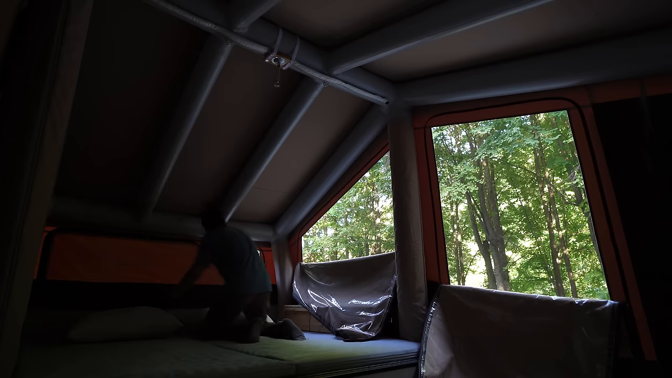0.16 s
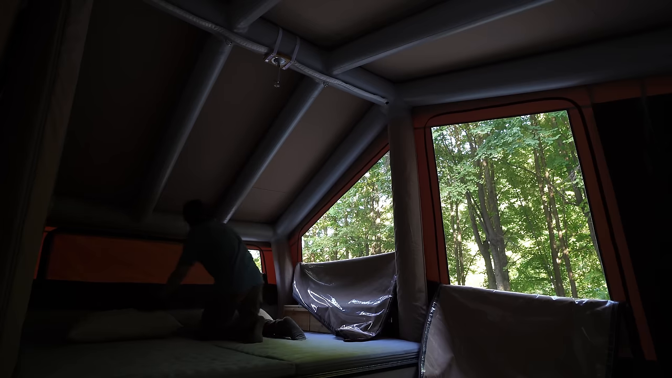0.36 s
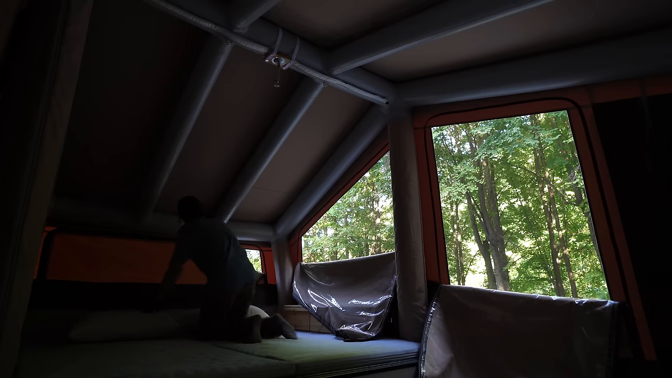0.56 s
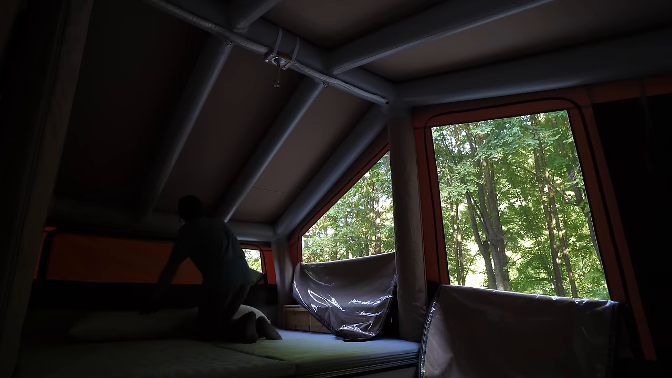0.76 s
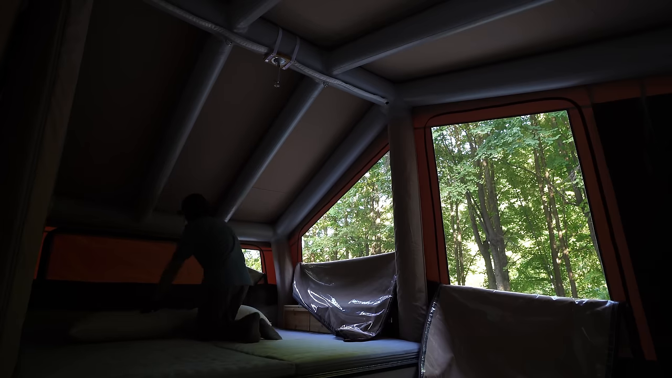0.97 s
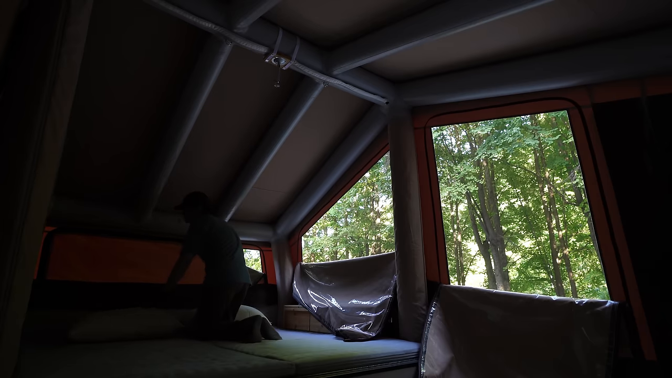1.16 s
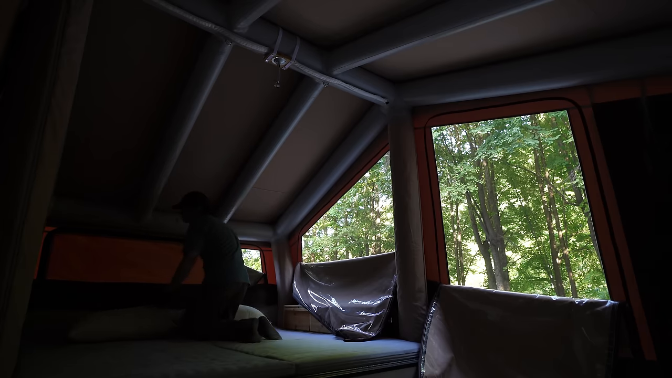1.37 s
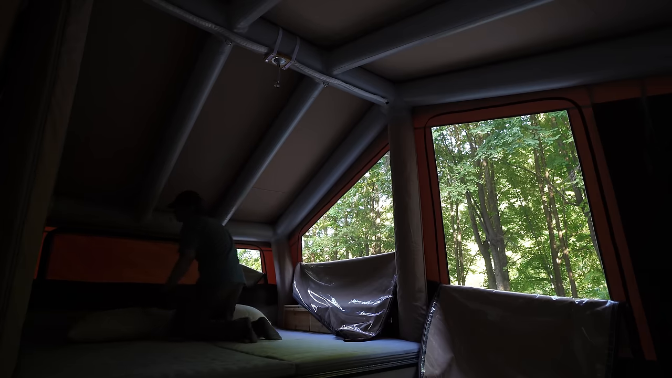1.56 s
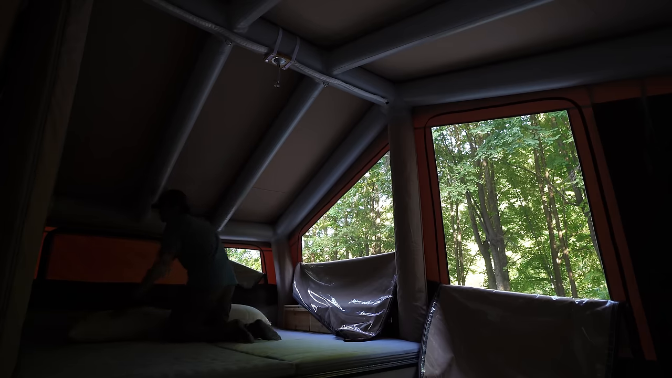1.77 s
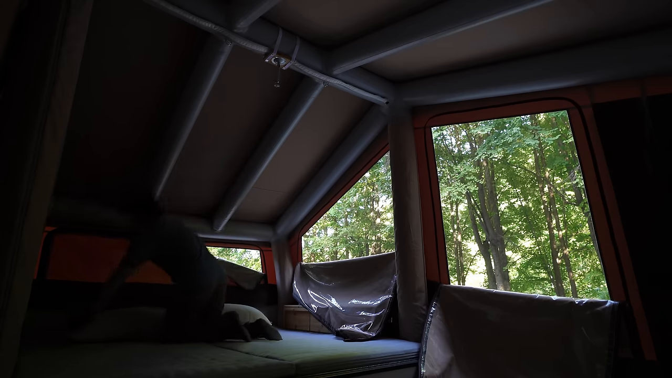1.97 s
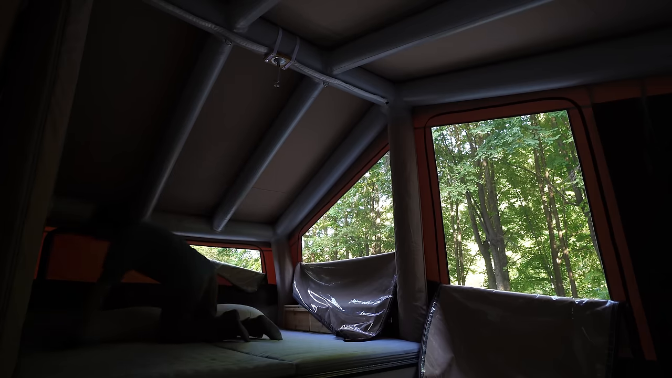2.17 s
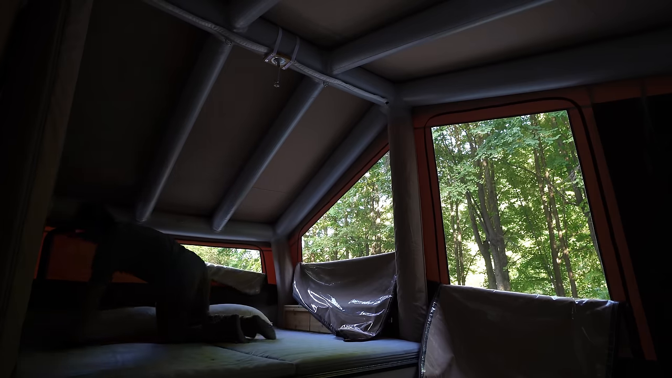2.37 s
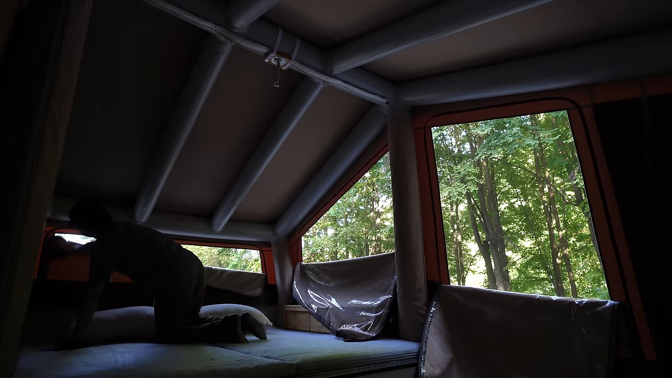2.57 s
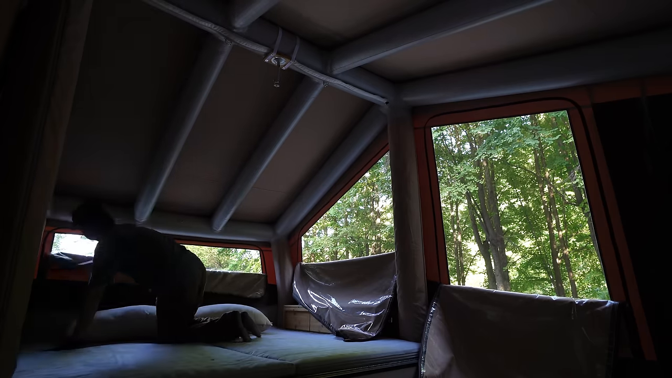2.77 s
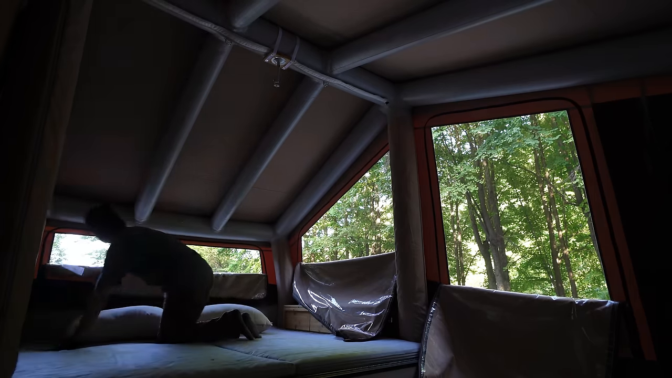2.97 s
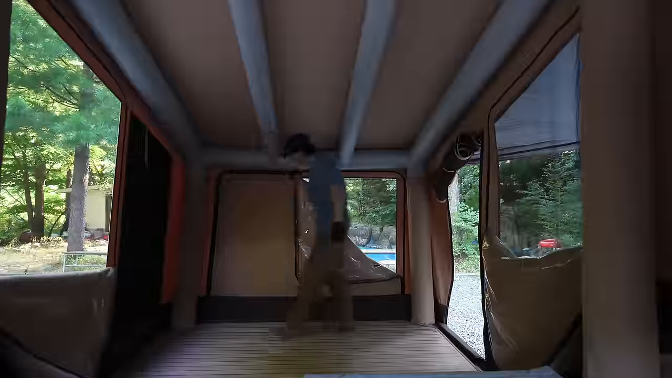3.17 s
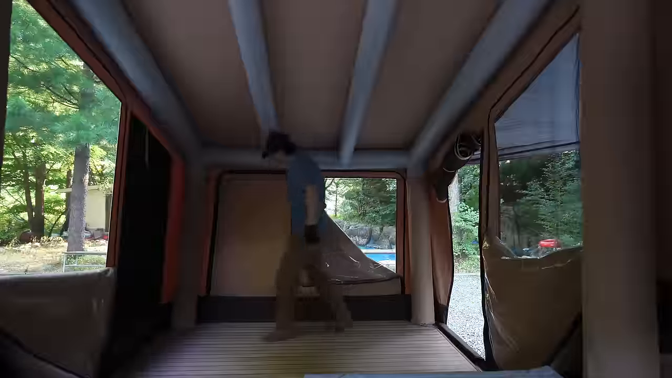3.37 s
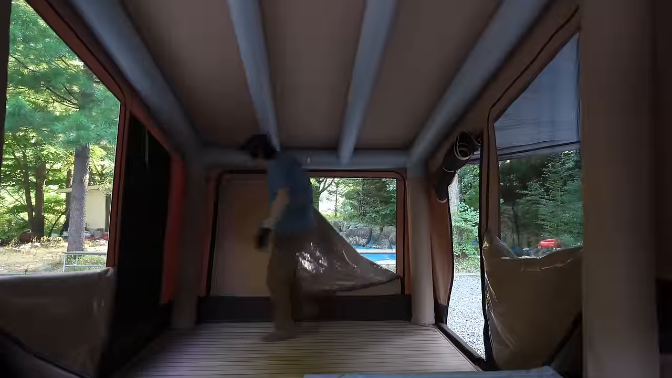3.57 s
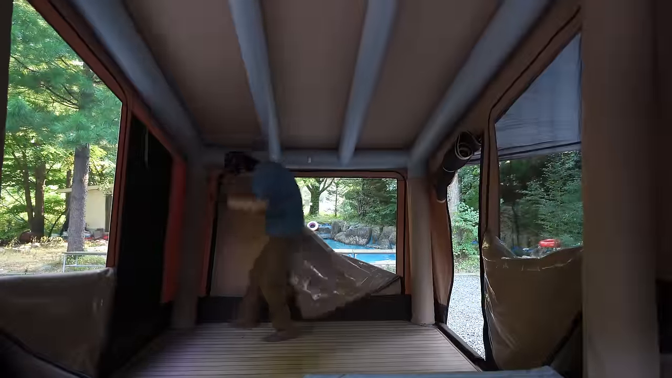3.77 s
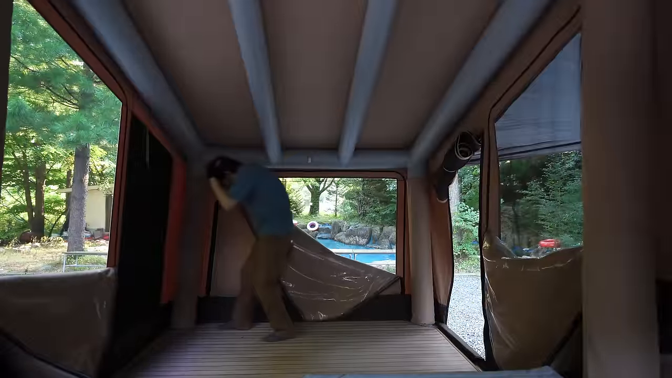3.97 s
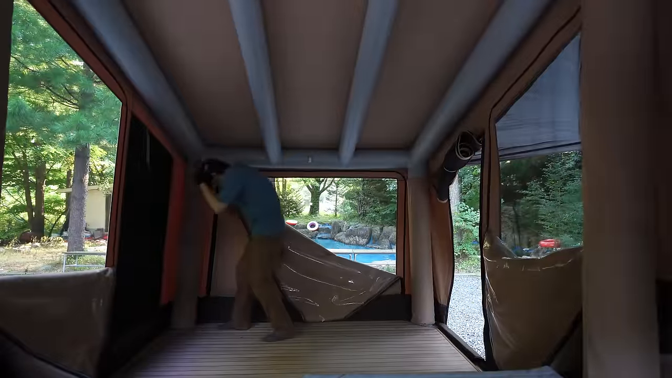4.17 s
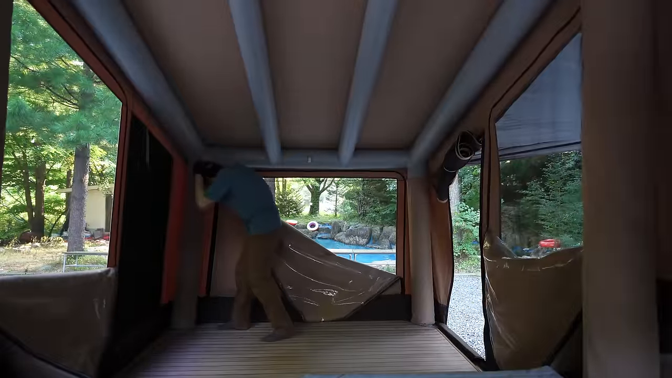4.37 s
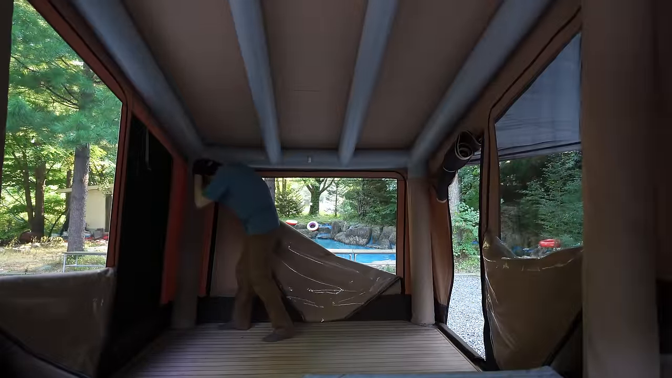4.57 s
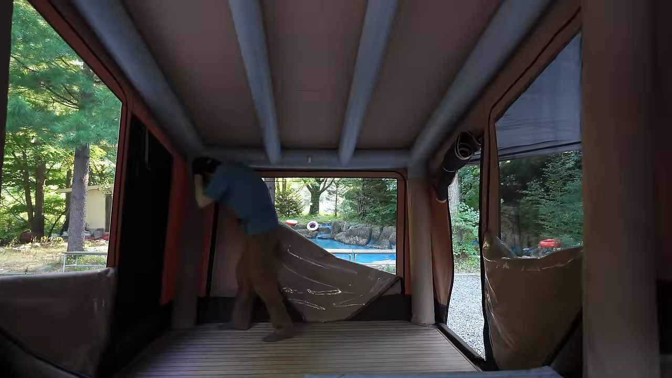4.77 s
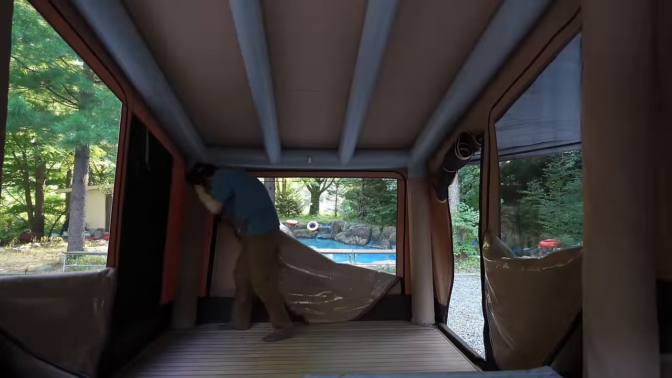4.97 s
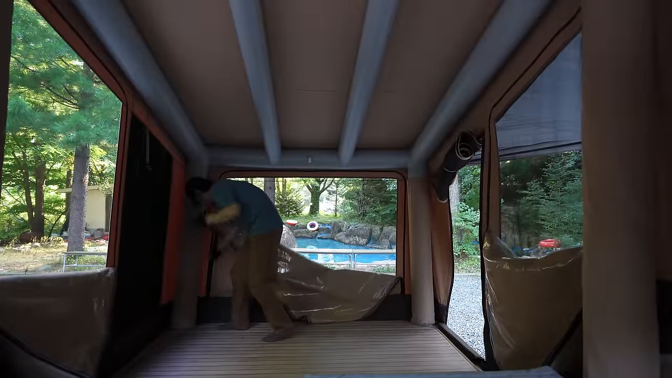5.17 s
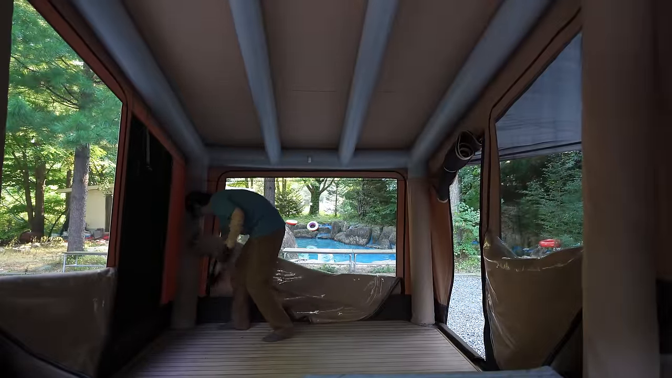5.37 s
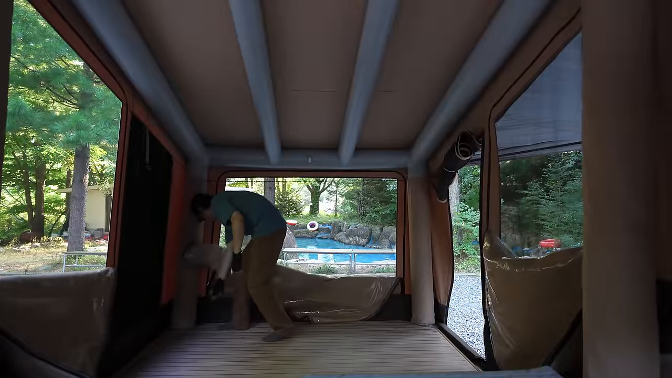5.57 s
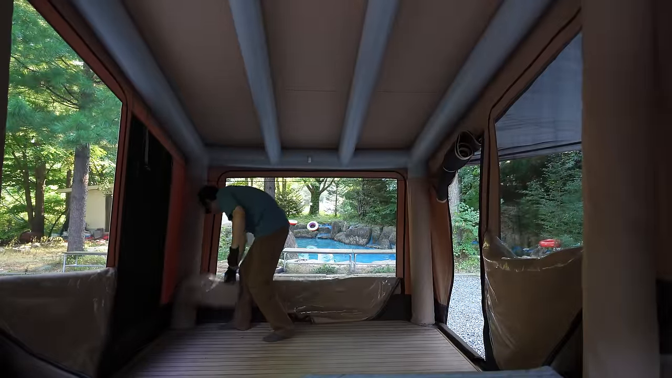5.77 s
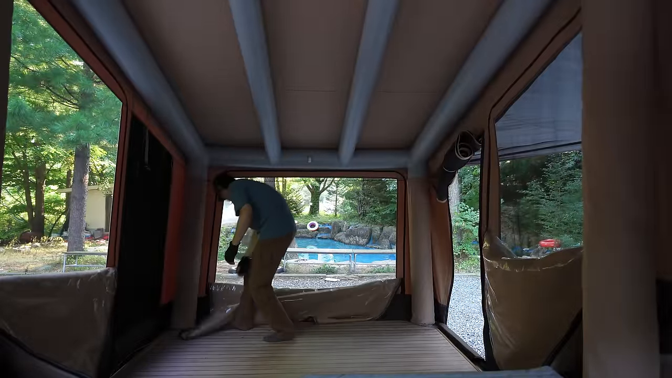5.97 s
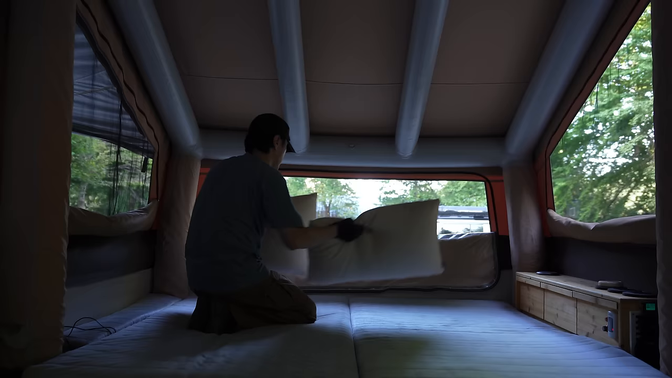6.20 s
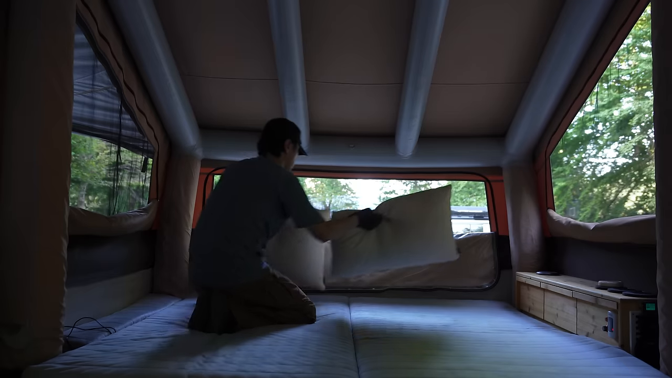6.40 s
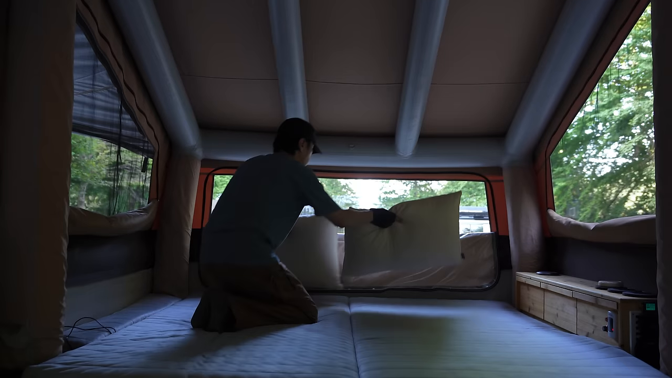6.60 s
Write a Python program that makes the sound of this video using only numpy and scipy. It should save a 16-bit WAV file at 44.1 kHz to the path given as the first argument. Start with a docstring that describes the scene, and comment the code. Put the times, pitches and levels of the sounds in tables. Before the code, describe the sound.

Three long zips open the windows of a tent, the buzz of each climbing and dropping with the hand's speed. Vinyl rustles before and between them, with small jingles of pull tabs and dull bumps on the floor, and finishes with a flurry of crinkles and slaps. Heard from inside the tent, the woods add a soft hiss of leaves, thin insect trills and occasional low gusts.

```python
"""Unzipping tent windows

Inside a large tent, zippers are run open in three long pulls. Each parting tooth gives a pulse, so the pitch of
the buzz rises and falls with the hand's speed. Vinyl flaps rustle, squeak and slap, metal pull tabs jingle, and
knees and feet excite the floor's low modes. Outside, a light breeze rumbles on the tent and stirs the leaves of
the woods, an insect buzzes and a bird trills."""
import sys
import numpy as np
from scipy import signal
from scipy.fft import rfft, irfft, next_fast_len
from scipy.io import wavfile
from scipy.ndimage import uniform_filter1d, map_coordinates

SR = 44100
rng = np.random.default_rng(int(sys.argv[2]) if len(sys.argv) > 2 else 0)


def master(y):
    """Save y as 16-bit WAV."""
    cut = np.clip(np.atleast_2d(y).T, -1, 1)
    pcm = np.round(cut * 32767)  # scale
    wavfile.write(sys.argv[1], SR, pcm.astype(np.int16))


N = 292824

# spectra of rasping metal, rubbing vinyl and crackling creases: (frequency [Hz], level [dB])
RASP_SPECTRUM = [(2470, -5), (4200, -1), (4670, -1), (7350, -1.5), (8840, -1), (10600, -9), (13300, -7.5),
                 (15000, -12), (16000, -15)]
RUB_SPECTRUM = [(50, -37), (90, -1), (160, -3), (240, -11), (350, -8), (550, 4), (900, 6), (1500, 2.5),
                (2200, -1), (3200, -8), (4500, -37), (7000, -46)]
CRINKLE_SPECTRUM = [(1470, -5), (2500, -2.5), (3230, -1.5), (3800, -3), (8730, -5.5), (10400, -11.5),
                    (14600, -13.5), (15200, -21), (16000, -8.5)]
STUTTER_HZ = 806.6  # reference tooth rate: the slower the slider, the more it sticks


def amp(db):
    """Decibels to amplitude ratio."""
    return 10 ** (np.asarray(db) / 20)


def unit(x):
    """Normalisation to rms 1."""
    return x / np.sqrt(np.mean(x ** 2) + 1e-20)


def along(points, hz):
    """Interpolation of (frequency [Hz], value) points on a logarithmic axis."""
    freqs, values = np.transpose(points)
    return np.interp(np.log(hz + 1), np.log(freqs + 1), values)


def curves(rows, t):
    """Linear interpolation of each column of a timed table at the times t."""
    times, *columns = np.transpose(rows)
    return [np.interp(t, times, column) for column in columns]


def wobble(rate, n):
    """Smooth random modulation: a spline through `rate` knots a second."""
    knots = rng.standard_normal(int(n * rate / SR) + 4)
    return map_coordinates(knots, [np.arange(n) * rate / SR], mode="nearest")


def coloured(x, spectrum):
    """Spectral shaping by (frequency [Hz], level [dB]) points, at rms 1."""
    m = next_fast_len(len(x) + 8192)
    gain = amp(along(spectrum, np.fft.rfftfreq(m, 1 / SR)))
    return unit(irfft(rfft(x, m) * gain, m)[:len(x)])


def noise(spectrum, n):
    """Stationary Gaussian noise with the given spectrum."""
    return coloured(rng.standard_normal(n), spectrum)


def grainy(spectrum, n, rate, depth_db):
    """Friction noise: brief catches of random strength, `rate` a second."""
    return coloured(rng.standard_normal(n) * amp(depth_db * wobble(rate, n)), spectrum)


def envelope(t, attack, hold, t60):
    """A linear attack, then exponential decay from the time `hold` on."""
    return np.clip(t / attack, 0, 1) * amp(-60 * np.maximum(t - hold, 0) / t60)


def faded(x):
    """A cosine taper softens both ends."""
    return x * signal.windows.tukey(len(x), min(1, 0.013 * SR / len(x)))


def add(out, start, x):
    """Superposition of x on out, from `start` seconds."""
    part = out[max(0, round(start * SR)):][:len(x)]
    part += x[:len(part)]


def in_tent(x, wet_db):
    """Reverberation: the fabric walls add a short diffuse tail, at unchanged power."""
    # decay inside the tent: (frequency [Hz], t60 [s])
    decay = [(100, 0.54), (700, 0.11), (3000, 0.17), (12000, 0.098)]
    hz, t, bins = signal.stft(rng.standard_normal(SR // 3), SR, nperseg=256)
    tail = signal.istft(bins * amp(-60 * t / along(decay, hz)[:, None]), SR, nperseg=256)[1]
    response = np.concatenate([[1], np.zeros(SR // 400), amp(wet_db) * tail / np.linalg.norm(tail)])
    return signal.fftconvolve(x, response / np.linalg.norm(response))


def breeze(calm_db=-49.5):
    """Pressure fluctuations: gusts push on the tent and swell a low rumble."""
    # gusts: (peak time [s], half-width [s], level [dB])
    gusts = [(.25, .5, -40), (2.4, .5, -44), (3.43, .2, -32), (4.04, .22, -25), (5.1, .15, -47),
             (6.45, .3, -38)]
    # rumble spectrum: (frequency [Hz], level [dB])
    spectrum = [(12, 1), (26, 5), (36, -31), (50, -11), (90, -27), (200, -50)]
    t = np.arange(N) / SR
    swells = sum(amp(db) * np.exp(-((t - peak) / width) ** 2) for peak, width, db in gusts)
    return (amp(calm_db) + swells) * amp(1.5 * wobble(6, N)) * noise(spectrum, N)


def woods():
    """Incoherent sources: countless leaves sum to broadband noise, with a far hiss above it."""
    # steps in the outdoor level: (start [s], leaves [dB], hiss [dB])
    steps = [(0, -43.5, -52.5), (3.137, -40.5, -51), (6.237, -44, -53)]
    # spectra of the leaves and the hiss: (frequency [Hz], level [dB])
    leaf_spectrum = [(29, -37), (50, 6), (59, -8), (165, -4), (273, -7), (312, -7), (378, -8.5),
                     (505, -5.5), (972, -7.5), (1570, -9), (5000, -20.5), (6500, -47), (11000, -120)]
    hiss_spectrum = [(2060, -3), (3500, -9), (4900, -6), (5330, -1), (6610, -3), (8260, -7), (10600, -16.5),
                     (14500, -15.5), (16000, -25)]
    starts, leaves_db, hiss_db = np.transpose(steps)
    step = np.searchsorted(starts[1:], np.arange(N) / SR)
    leaves = amp(leaves_db[step] + 0.6 * wobble(8.8, N)) * noise(leaf_spectrum, N)
    hiss = amp(hiss_db[step] + 1.2 * wobble(4, N)) * noise(hiss_spectrum, N)
    return leaves + hiss


def insect_and_bird():
    """Narrowband noise: an insect buzzes, loud and then subdued; a bird gives thin trills."""
    # buzzes: (start [s], hold [s], t60 [s], level [dB])
    buzzes = [(-.05, 0.2, 0.41, -43.5), (0.205, 1.6, 12, -55)]
    # trills: (start [s], end [s], level [dB])
    trills = [(0.448, 0.678, -54.5), (1.372, 1.68, -57.5), (3.22, 3.45, -58), (4.274, 4.573, -55)]
    # their spectra: (frequency [Hz], level [dB])
    buzz_band = [(6000, -40), (7400, -7), (8200, -1), (8800, -4), (9700, -14), (13000, -23)]
    trill_band = [(6200, -50), (6680, 3), (6900, -3), (7400, -50)]
    t = np.arange(N) / SR
    buzz = noise(buzz_band, N)
    calling = sum(amp(db) * envelope(t - start, 0.053, hold, t60) for start, hold, t60, db in buzzes)
    out = calling * amp(0.86 * wobble(90, N)) * buzz
    for start, end, db in trills:
        add(out, start, amp(db) * faded(noise(trill_band, int((end - start) * SR))))
    return out


def thuds():
    """Modal response: soft impacts of knees and feet set the floor's damped modes ringing."""
    # impacts: (time [s], relative level [dB], low-mode boost [dB])
    impacts = [(0.311, -28.5, 3.5), (0.389, -26, 0), (1.545, -28, -21), (2.225, -30.5, 8),
               (2.712, -17, -13), (2.971, -19, -44), (3.3, -25, 0), (3.316, -30, 9), (3.707, -13, -5.5),
               (3.813, -17.5, -13), (3.912, -3.5, -8), (3.918, -18, -5), (4.112, -27, -17),
               (4.2, -25.5, -15), (5.955, -21.5, -5), (6.04, -21, -7), (6.42, -22.5, -14)]
    # floor modes: (frequency [Hz], level [dB], t60 [s])
    modes = [(79.8, 3, 0.14), (122, -4, 0.15), (166, 0, 0.12), (246.5, -1, 0.055), (363, -7, 0.1),
             (507, 1, 0.06), (608, 1, 0.052), (803, 4, 0.022)]
    out, t = np.zeros(N), np.arange(SR // 3) / SR
    onset = 1 - np.exp(-t / 0.0016)
    for start, db, boom_db in impacts:
        ring = np.zeros(len(t))
        for hz, level, t60 in modes:
            weight_db = along([(150, boom_db), (280, 0)], hz)
            decay = amp(level + weight_db + rng.normal(0, 1) - 60 * t / t60)
            ring += decay * np.sin(2 * np.pi * (hz * rng.normal(1, 0.12) * t + rng.random()))
        scuff = 0.14 * amp(-60 * t / 0.059) * noise(RUB_SPECTRUM, len(t))
        add(out, start, in_tent(amp(db - 7.5) * (ring + scuff) * onset, wet_db=-6))
    return out


def flaps(rub_attack_s=0.028, crinkle_attack_s=0.018):
    """Sliding friction: vinyl rubs over cloth while its small creases crackle."""
    # hand strokes: (start [s], hold [s], t60 [s], relative rub [dB], relative crinkle [dB])
    strokes = [ (0.294, .13, 0.86, -36.5, -43.5), (0.379, 0.071, 0.23, -25, -46),
               (2.666, 0.18, 0.54, -32, -40), (2.803, 0.072, 1, -27, -37.5), (2.93, .16, .1, -44, -45),
               (3.075, 0.045, .07, -38, -39), (3.161, 0.03, 0.14, -49, -43.5), (3.292, .035, .1, -30, -46),
               (4.048, 0.081, 0.23, -31, -39.5), (4.184, .025, 0.15, -36, -55),
               (4.301, 0.5, 0.51, -47, -52), (4.56, 0.13, .3, -48, -44), (4.65, 0.14, .2, -31, -38),
               (5.438, 0.052, 0.85, -32.5, -37), (5.548, 0.39, 0.44, -40, -42),
               (5.776, 0.058, 0.89, -40, -29.5), (5.885, 0.063, 0.54, -25.5, -41),
               (5.99, 0.05, 0.28, -27.5, -36.5), (6.132, 0.054, 0.13, -26.5, -43.5),
               (6.165, 0.06, 0.031, -38, -36.5)]
    out = np.zeros(N)
    for start, hold, t60, rub_db, crinkle_db in strokes:
        t = np.arange(int((hold + t60) * SR)) / SR
        rub = grainy(RUB_SPECTRUM, len(t), rate=130, depth_db=3.5)
        rub *= amp(rub_db - 4.5) * envelope(t, rub_attack_s, hold, t60)
        crinkle = grainy(CRINKLE_SPECTRUM, len(t), rate=1100, depth_db=1.5)
        crinkle *= amp(crinkle_db + 1) * envelope(t, crinkle_attack_s, hold, t60)
        add(out, start, in_tent(rub + crinkle, wet_db=-9.5))
    return out


def squeaks():
    """Stick-slip oscillation: vinyl catches on itself and gives a brief, uneven glide."""
    # glides: (start [s], length [s], first pitch [Hz], last pitch [Hz], relative level [dB])
    glides = [(1.001, 0.026, 1540, 1600, -43.5), (3.175, 0.026, 2890, 2830, -40),
              (5.769, .055, 3720, 2910, -37.5)]
    out = np.zeros(N)
    for start, length, first_hz, last_hz, db in glides:
        n = int(length * SR)
        hz = np.linspace(first_hz, last_hz, n) + 170 * wobble(1093, n)
        tone = unit(faded(np.sin(2 * np.pi * np.cumsum(hz) / SR)))
        add(out, start, in_tent(amp(db + 3.5) * tone, wet_db=-7))
    return out


def snaps(t60=0.031):
    """Impulsive excitation: a fold flips over with a dull slap of the sheet and a sharper crack."""
    # flipping folds: (time [s], level [dB], relative treble [dB])
    folds = [(.296, -24.5, -27), (1.064, -30, -8), (1.273, -29.5, -6.5), (1.344, -40, -2),
             (2.831, -26, -22), (5.451, -13, -8.5), (5.782, -27, 1), (5.921, -10.5, -5), (5.924, -11, -17),
             (5.936, -23, 7), (5.939, -15, 2), (5.999, -16, -23), (6.175, -18.5, -21)]
    # slap spectrum: (frequency [Hz], level [dB])
    slap_spectrum = [(60, -32), (150, -7.5), (500, 8), (700, 6), (1050, -7), (1550, 2), (2700, -25),
                     (4000, -45), (7000, -35)]
    out, t = np.zeros(N), np.arange(SR // 8) / SR
    for start, db, treble_db in folds:
        slap = amp(-4 - 60 * t / t60) * noise(slap_spectrum, len(t))
        crack = amp(treble_db - 60 * t / t60) * noise(CRINKLE_SPECTRUM, len(t))
        add(out, start, in_tent(amp(db) * (slap + crack), wet_db=-5.5))
    return out


def jingles(touches=3, bounce_s=0.026, loss_db=6):
    """Inelastic collisions: dangling metal tabs tick, ring and rebound, losing energy each time."""
    # first contacts: (time [s], relative level [dB])
    contacts = [(.336, -47), (.408, -47), (.462, -52), (.934, -55), (1.322, -50), (2.718, -50),
                (4.318, -58), (5.454, -42)]
    # modes of a pull tab: (frequency [Hz], level [dB], t60 [s])
    modes = [(5800, 7.5, 0.09), (8600, -3, .05), (9640, 10.5, 0.056), (12400, 7, 0.044), (15380, 10, 0.091)]
    out, t = np.zeros(N), np.arange(SR // 6) / SR
    for start, db in contacts:
        for k in range(touches):
            ring = np.zeros(len(t))
            for hz, level, t60 in modes:
                decay = amp(level + rng.normal(0, 4.9) - 60 * t / t60)
                ring += decay * np.sin(2 * np.pi * hz * t + wobble(340, len(t)))
            tick = amp(7 - 60 * t / 0.0086) * noise(RASP_SPECTRUM, len(t))
            touch = ring * (1 - np.exp(-t / 0.002)) + tick
            delay = k * bounce_s * rng.uniform(0.63, 1.2)
            add(out, start + delay, in_tent(amp(db - k * loss_db) * touch, wet_db=-4))
    return out


def first_teeth(start_s=4.565, count=11, level_db=-19):
    """Free vibration: before the third pull, single teeth let go and pluck the taut panel."""
    # panel modes: (frequency [Hz], level [dB], t60 [s])
    modes = [(356, -16, 0.15), (580, -3, 0.02), (850, -12, 0.03), (1500, -10, 0.0096)]
    out, t = np.zeros(N), np.arange(SR // 20) / SR
    gaps = np.maximum(0.02 * 0.87 ** np.arange(count), 0.0112)  # seconds, shrinking to a limit
    for start in start_s + np.cumsum(gaps) - gaps:
        pluck = sum(amp(level - 60 * t / t60) * np.sin(2 * np.pi * hz * rng.normal(1, 0.089) * t)
                    for hz, level, t60 in modes)
        add(out, start, in_tent(amp(level_db) * pluck / np.abs(pluck).max(), wet_db=-11))
    return out


def patchy(x, depth_db):
    """Interference from folds and wall echoes, as a random gain drifting in frequency and time."""
    bins = signal.stft(x, nperseg=512)[2]
    field = uniform_filter1d(rng.standard_normal(bins.shape), size=5, axis=0)
    field = uniform_filter1d(field, size=5, axis=1)
    return unit(signal.istft(bins * amp(depth_db * unit(field)), nperseg=512)[1][:len(x)])


def saturation(pace, knee_hz, growth):
    """Saturating power law: gain rises with the tooth rate and levels off above a knee."""
    return 1 / np.sqrt(1 + (knee_hz / pace) ** growth)


def tooth_train(teeth, rate):
    """A pulse train of steady power, one pulse a tooth; timing jitter grows at low speed."""
    n = len(teeth)
    at = np.interp(np.arange(1, int(teeth[-1])), teeth, np.arange(n))
    jitter = 0.016 * STUTTER_HZ / rate[at.astype(int)] * np.gradient(at)
    at += jitter * rng.standard_normal(len(at))
    grip = amp(2.1 * rng.standard_normal(len(at)))
    taps = at.astype(int)[:, None] + np.arange(-7, 9)
    pulses = grip[:, None] * np.sinc(taps - at[:, None])  # band-limited, placed between samples
    train = np.bincount(np.clip(taps, 0, n - 1).ravel(), pulses.ravel(), n)
    offset = np.sqrt(rate) * grip.mean() / SR
    return train / np.sqrt(rate) - offset


def harmonic(teeth, order, rough):
    """A harmonic of the tooth rate, randomly modulated in phase and amplitude."""
    n = len(teeth)
    tone = np.sin(2 * np.pi * order * teeth + rough * wobble(500, n))
    return unit(tone * amp(2.65 * wobble(70.68, n) + 2.7 * wobble(300, n)))


def zipper(speed, effort, hum_db, overtone_db, click_db, scrape_db, rasp_db, slack_s):
    """Forced vibration: parting teeth click and drive the panel, with friction noise on top."""
    # spectrum of the tooth clicks: (frequency [Hz], level [dB])
    click_spectrum = [(200, -31), (600, -7), (1100, 0), (1600, 11.5), (2100, 8), (2700, 1), (3100, 4),
                      (3600, 3), (4300, 0.5), (5000, -2), (7200, -7), (9000, -25), (15000, -24)]
    # how strongly the tape radiates an overtone: (frequency [Hz], gain [dB])
    tape = [(1000, 4.5), (1600, 0), (2100, -8), (2700, 3.5), (3300, 0), (4400, 4.5)]
    attack_s, release_s = 0.07, 0.038  # the slider takes up the load and lets it go
    t = np.arange(int(speed[0][0] * SR), int(speed[-1][0] * SR)) / SR
    n, elapsed, remaining = len(t), t - t[0], t[-1] - t
    pace = curves(speed, t)[0]
    panel_db, force_db = curves(effort, t)
    load = amp(force_db) * (1 - np.exp(-elapsed / attack_s)) * (1 - np.exp(-remaining / release_s))
    strike = load * saturation(pace, knee_hz=650, growth=4.7)
    # the rate wavers when a slow slider sticks, and more as the tape goes slack at the end
    stutter = STUTTER_HZ / pace
    slack = np.exp(-remaining / slack_s)
    waver = 0.028 * stutter ** 1.4 * (1 + 3 * slack)
    rate = pace * np.exp(waver * (wobble(70, n) + wobble(350, n)))
    teeth = np.cumsum(rate) / SR  # teeth passed so far
    clicks = strike * amp(click_db + 1.1 * wobble(43.7, n))
    clicks *= patchy(coloured(tooth_train(teeth, rate), click_spectrum), depth_db=4.5)
    # part of the panel's hum is scraping, most of all as the slider breaks loose and as it stops
    grit = amp(scrape_db + 4.6 * np.exp(-elapsed / 0.061) + 8.2 * slack) * stutter
    # scrape spectrum: (frequency [Hz], level [dB])
    scrape_spectrum = [(60, -3), (150, -11), (350, -5), (600, 7), (1000, 8.5), (1800, -3), (2800, -1.5),
                       (4500, -31), (8000, -40)]
    hum = harmonic(teeth, order=1, rough=0.12) + grit * noise(scrape_spectrum, n)
    panel = amp(panel_db + hum_db) * hum / np.sqrt(1 + grit ** 2)
    # overtones sing out as they sweep through the tape's resonances
    second = amp(along(tape, 2 * pace) - 2) * harmonic(teeth, order=2, rough=0.81)
    third = amp(along(tape, 3 * pace) - 8) * harmonic(teeth, order=3, rough=0.74)
    whine = strike * (1 - slack) * amp(overtone_db) * (second + third)
    # metal rasps hardest as each tooth passes
    bite = 1 + 0.28 * np.cos(2 * np.pi * teeth)
    rasp = patchy(bite * grainy(RASP_SPECTRUM, n, rate=500, depth_db=1), depth_db=1.8)
    rasp *= load * saturation(pace, knee_hz=780, growth=4.6) * amp(rasp_db)
    return in_tent(faded(panel + whine + clicks + rasp), wet_db=-8.5)


def zipper_pulls():
    """Periodicity pitch: the hand's speed sets the tooth rate, and so the pitch, of three pulls."""
    # the hand's speed: (time [s], tooth rate [Hz])
    speed_a = [(1.67, 310), (1.77, 866), (1.95, 1415), (2.0, 1415), (2.089, 1320), (2.18, 916),
               (2.239, 876), (2.33, 500), (2.445, 670), (2.49, 462), (2.565, 765), (2.605, 1140),
               (2.701, 495)]
    speed_b = [(3.4, 343), (3.49, 550), (3.561, 1000), (3.626, 1230), (3.7, 1130), (3.77, 790), (3.91, 560),
               (3.99, 625), (4.091, 386)]
    speed_c = [(4.72, 329), (4.79, 520.6), (4.841, 791.8), (4.88, 874), (4.92, 1104), (5.025, 1465),
               (5.09, 1360), (5.205, 836.4), (5.29, 857), (5.38, 663), (5.46, 322.2)]
    # the hand's effort: (time [s], relative panel hum [dB], slider force [dB])
    effort_a = [(1.67, -46, -7), (1.72, -27, -1.5), (1.849, -18.5, 4.5), (1.91, -26, 3.5), (2.06, -26, 4.5),
                (2.33, -31.5, 1.5), (2.49, -22, -0.5), (2.565, -20, 2), (2.61, -30, 4), (2.7, -30, 1.5)]
    effort_b = [(3.4, -41, 0.27), (3.46, -25, 2), (3.6, -19.5, 0.38), (3.66, -25.5, -2.4),
                (3.712, -17.5, -1.6), (3.75, -26, -1.4), (3.81, -22.5, 2.9), (3.93, -34, -1.6),
                (4.0, -17.5, -0.46), (4.09, -44, 1.3)]
    effort_c = [(4.72, -35, 2), (4.78, -24.5, 1.5), (4.86, -26.5, -3.5), (4.94, -25.5, 0.5), (5.01, -21, 0),
                (5.06, -27.5, -.5), (5.17, -27.5, -2), (5.26, -18, 1.5), (5.3, -24.5, -2.5),
                (5.335, -16.5, -1.5), (5.46, -32, 2)]
    out = np.zeros(N)
    add(out, speed_a[0][0], zipper(speed_a, effort_a, hum_db=2, overtone_db=-32.5, click_db=-27,
                                   scrape_db=-8.5, rasp_db=-32, slack_s=0.0698))
    add(out, speed_b[0][0], zipper(speed_b, effort_b, hum_db=0, overtone_db=-26, click_db=-25,
                                   scrape_db=-5.5, rasp_db=-24, slack_s=0.056))
    add(out, speed_c[0][0], zipper(speed_c, effort_c, hum_db=-2, overtone_db=-21.5, click_db=-20,
                                   scrape_db=-10, rasp_db=-23, slack_s=0.0123))
    return out


def scene():
    """Superposition: all sources sum to one signal, the same in both channels."""
    inside = zipper_pulls() + first_teeth() + jingles() + flaps() + squeaks() + snaps() + thuds()
    mono = inside + breeze() + woods() + insect_and_bird()
    return np.array([mono, mono])


def record(dry):
    """Band limiting: an ideal low-pass filter removes the highest treble."""
    cutoff_hz = 15750
    m = next_fast_len(N + SR // 4)
    passband = np.fft.rfftfreq(m, 1 / SR) < cutoff_hz
    return irfft(rfft(dry, m) * passband, m)[:, :N]


dry = scene()
out = record(dry)
master(out)
```